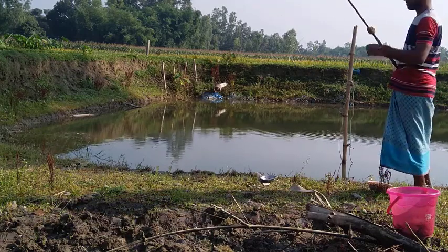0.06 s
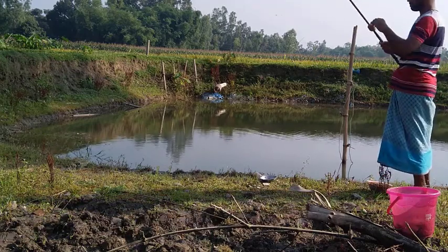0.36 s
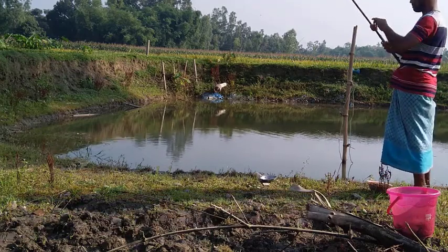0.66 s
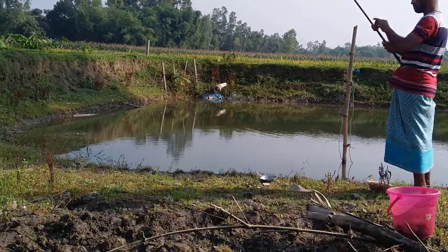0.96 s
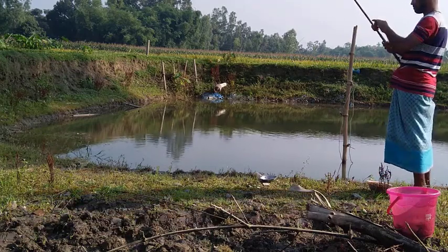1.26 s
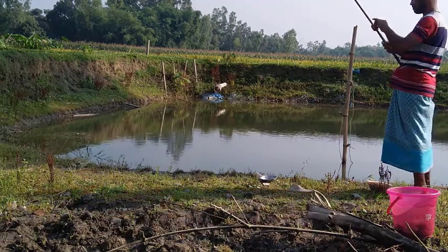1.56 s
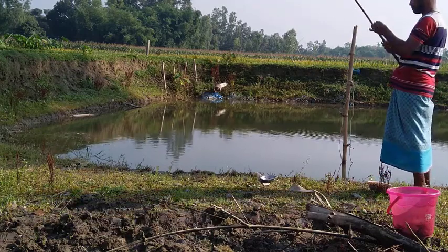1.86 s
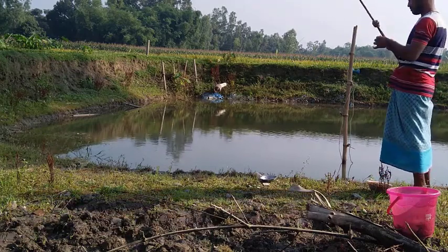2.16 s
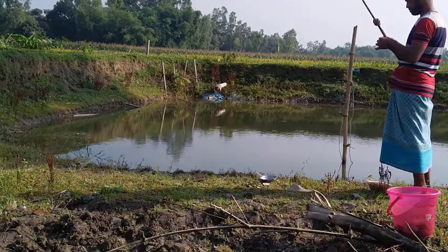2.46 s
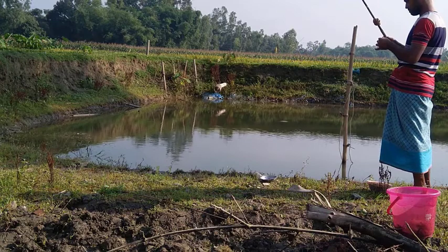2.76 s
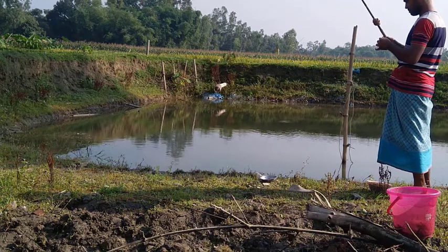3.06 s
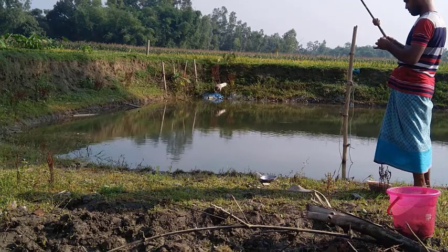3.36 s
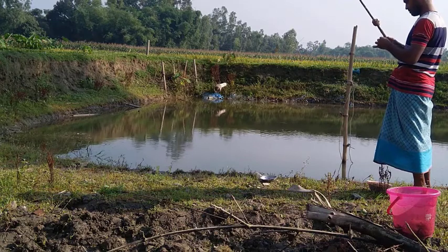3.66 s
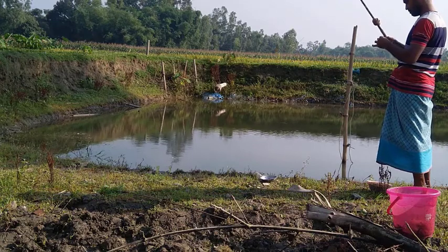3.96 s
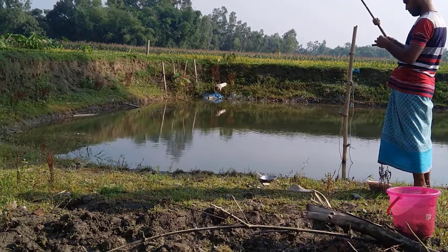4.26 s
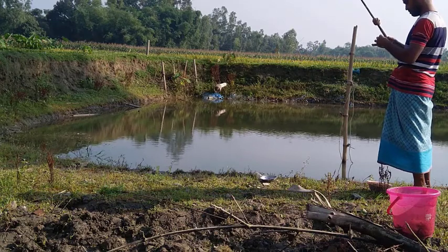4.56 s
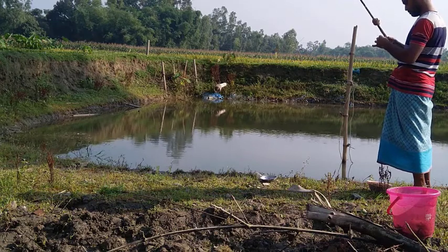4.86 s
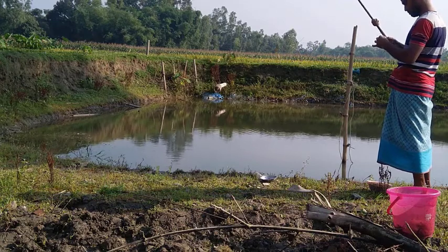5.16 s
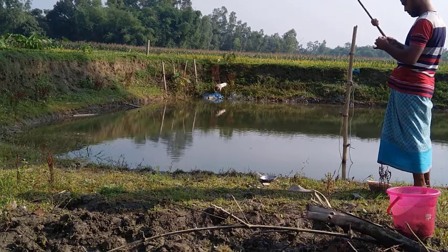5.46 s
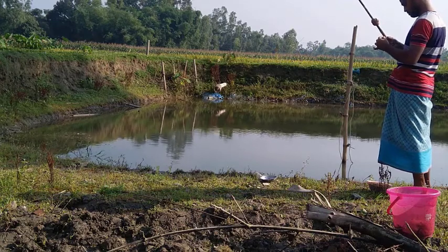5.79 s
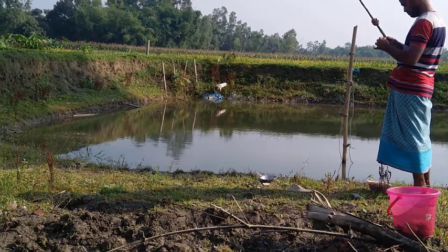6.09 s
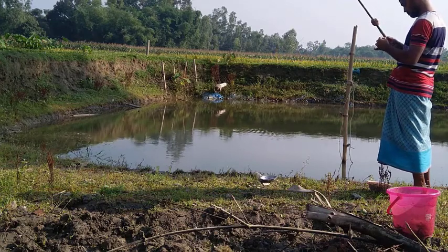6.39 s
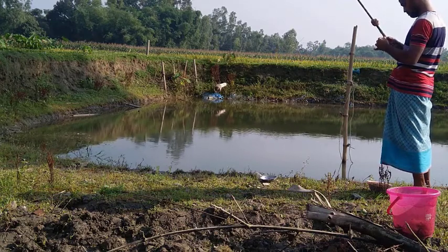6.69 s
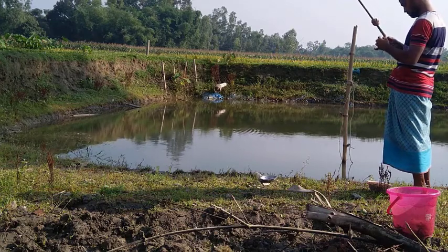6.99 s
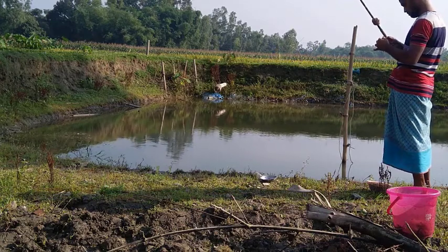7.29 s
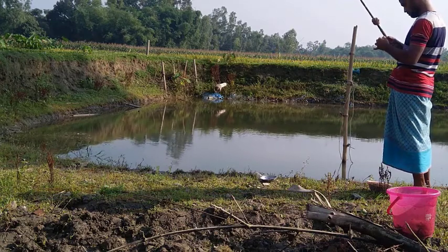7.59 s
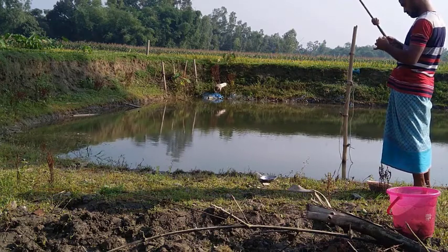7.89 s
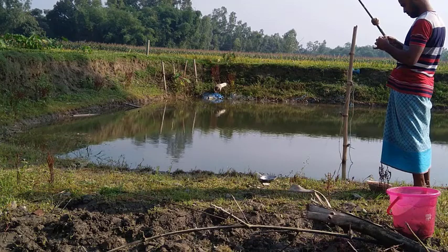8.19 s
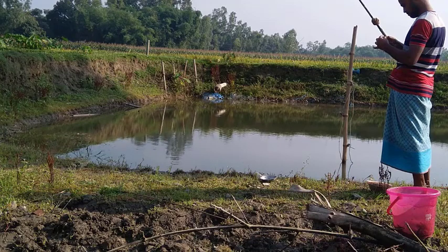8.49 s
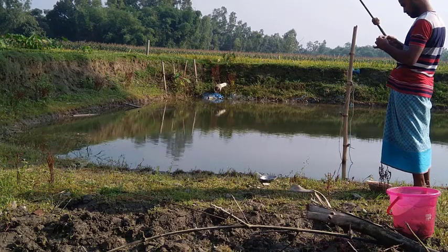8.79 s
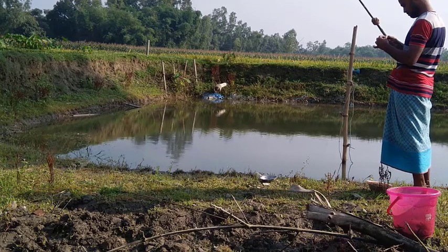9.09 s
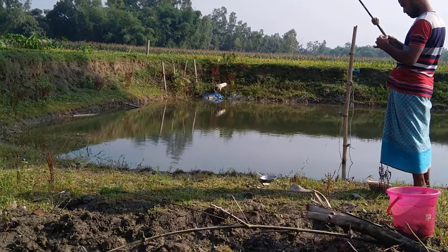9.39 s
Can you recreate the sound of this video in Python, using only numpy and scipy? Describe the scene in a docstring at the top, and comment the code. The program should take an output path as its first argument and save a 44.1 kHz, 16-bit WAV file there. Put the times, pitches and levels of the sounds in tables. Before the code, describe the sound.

Beside a pond in open fields, a nearby bird repeats a squeaky phrase of three falling notes at an even pace, and a second answers from farther off. High crickets chirp throughout, with soft rustles and light wind on the microphone. Midway, another bird gives a few thin arched whistles, while a distant idling engine speeds up and draws nearer as a low throb. The stereo sound leans to the right.

```python
"""A stereo microphone at a pond among fields. From the start crickets chirp and trill in the grass with
their wings, a slow engine idles far off and a bird whistles thin notes. Almost at once something rustles
close by, and a near bird begins repeating a squeaky phrase of three falling notes; a second answers from
farther off. Low calls follow from the tree line, then light gusts touch the microphone. After four seconds
the whistler gives a few long arched notes; after five the engine speeds up and draws nearer."""
import sys
import numpy as np
from scipy import signal
from scipy.fft import rfft, irfft, next_fast_len
from scipy.io import wavfile
from scipy.ndimage import uniform_filter1d

SR = 44100
rng = np.random.default_rng(int(sys.argv[2]) if len(sys.argv) > 2 else 0)


def int16_out(signal):
    """Quantize to a 16-bit WAV file."""
    q = np.round(np.clip(np.atleast_2d(signal).T, -1, 1) * 32767)
    wavfile.write(sys.argv[1], SR, q.astype(np.int16))


N = 425124
TIME = np.arange(N) / SR


def from_db(db):
    """Decibels to gain."""
    return 10 ** (np.asarray(db) / 20)


def rms_one(x):
    """Scale to unit power."""
    return x / np.sqrt(np.mean(x ** 2) + 1e-20)


def in_time(curve):
    """A curve of (t/s, value) points, read at every sample."""
    return np.interp(TIME, *np.transpose(curve))


def at_hz(spectrum, hz):
    """Read a spectrum on a log-frequency axis."""
    f, db = np.transpose(spectrum)
    return np.interp(np.log(np.maximum(hz, 1)), np.log(f), db)


def span(start, end):
    """The samples of a note, and its progress from 0 to 1."""
    at = slice(*np.searchsorted(TIME, [start, end]))
    return at, (TIME[at] - start) / (end - start)


def drift(rate_hz):
    """A random wander with spread 1, mostly slower than rate_hz."""
    pole = np.exp(-40 * np.pi * rate_hz / SR)
    slow = signal.lfilter([1], [1, -2 * pole, pole * pole], rng.standard_normal(N // 20 + 2002))[2000:]
    return np.interp(np.arange(N) / 20, np.arange(len(slow)), rms_one(slow))


def delayed(x, seconds):
    """The same sound, later."""
    return np.interp(TIME - seconds, TIME, x, left=0, right=0)


def place(x, pan_db, lead_ms):
    """Set a source before the microphone: the left side is louder by pan_db and earlier by lead_ms."""
    gains = from_db([[pan_db / 2], [-pan_db / 2]])
    return np.array([x, delayed(x, lead_ms * 1e-3)]) * gains / gains.mean()


def noise(spectrum, alike, pan_db, lead_ms):
    """Stereo noise of a given colour, left-right likeness (0 to 1) and direction."""
    size = next_fast_len(N)
    hz = np.fft.rfftfreq(size, 1 / SR)
    mid, side = rfft(rng.standard_normal((2, size))) * from_db(at_hz(spectrum, hz))
    left, right = np.sqrt(1 + alike) * mid + np.sqrt(1 - alike) * side * [[1], [-1]]
    right = right * from_db(-pan_db) * np.exp(-2j * np.pi * hz * lead_ms / 1000)
    return rms_one(irfft(np.array([left, right]), size)[:, :N])


def patchy(pair, depth_db, frames):
    """Neighbouring pitches swell and fade on their own, in patches a few frames long."""
    _, _, cells = signal.stft(pair, nperseg=512)
    patches = uniform_filter1d(rng.standard_normal(cells.shape[1:]), size=3, axis=0)
    patches = rms_one(uniform_filter1d(patches, size=frames, axis=1))
    _, mottled = signal.istft(cells * from_db(depth_db * patches))
    return rms_one(mottled[:, :N])


def scatter(pair, wet_db, t60):
    """Grass and trees send back a diffuse tail, different on each side."""
    t = TIME[:SR]
    tail = rng.standard_normal((2, SR)) * from_db(-60 * t / t60) * (1 - np.exp(-t / .008))
    tail /= np.sqrt(np.sum(tail ** 2, axis=1, keepdims=True))
    return pair + from_db(wet_db) * signal.fftconvolve(pair, tail, axes=1)[:, :N]


# colour of the far field and its insects: f/Hz, relative level/dB
HISS_SPECTRUM = [(300, -5), (1000, -1), (2700, -23.5), (3600, -9), (6400, -15), (7400, -7.5), (8500, -8),
                 (9400, 3), (10400, -3), (11000, -29.5)]

def far_hiss():
    """A faint, steady hiss from all round the microphone."""
    return from_db(-58.5) * noise(HISS_SPECTRUM, alike=0.29, pan_db=-1.0, lead_ms=0.37)


# colour of a mid-pitched background hiss: f/Hz, relative level/dB
MID_HISS_SPECTRUM = [(250, -17), (450, -9.5), (700, 5.5), (1100, 2.5), (1500, 6.5), (1950, 2), (2300, -3),
                     (2700, 0.5), (3100, -5), (3700, -29), (6000, -38)]
# its level between rustles: t/s, level/dB
MID_HISS_LEVEL = [(0, -63.5), (2.6, -65.5), (4.3, -57.5), (5.8, -54.5), (6.3, -42.5), (7.2, -53),
                  (7.95, -50), (8.4, -42), (9.64, -42)]

def mid_hiss(rustle_swell):
    """A mid-pitched background hiss that flickers, swells and sinks, rising with each rustle."""
    hiss = patchy(noise(MID_HISS_SPECTRUM, alike=0.71, pan_db=-9.5, lead_ms=0.42), depth_db=3.5, frames=12)
    level = np.hypot(from_db(in_time(MID_HISS_LEVEL)), rustle_swell)
    return level * from_db(2.25 * drift(20)) * hiss


# the engine idles, then picks up speed: t/s, firing rate/Hz
FIRING_RATE = [(5.3, 37.8), (5.96, 39.8), (6.57, 42.3), (7.34, 41.6), (8.45, 44.4), (9.64, 48.1)]
# its loudness as it nears the microphone: t/s, level/dB
ENGINE_APPROACH = [(0, -40.5), (.6, -43), (1.0, -35), (2.0, -33), (2.8, -37.5), (3.4, -35.5), (4.0, -39),
                   (5.2, -33), (5.5, -25.5), (6.6, -22), (7.4, -25), (8.3, -22.5), (9.0, -19),
                   (9.64, -17.5)]
# colour of the exhaust from a distance: f/Hz, relative level/dB
EXHAUST_SPECTRUM = [(40, -24), (65, -19.5), (85, -2.5), (125, -3), (148, -0.5), (172, -15), (210, -13),
                    (260, -27.5), (330, -28.5)]
# colour of the rumble beneath it: f/Hz, relative level/dB
RUMBLE_SPECTRUM = [(20, -17.5), (45, -21.5), (75, -1.5), (120, 2), (190, -1.5), (250, -12), (330, -25),
                   (450, -42), (700, -66)]

def engine():
    """Only the lowest orders of the exhaust carry this far; they waver in the air, over a dull rumble."""
    firing_hz = in_time(FIRING_RATE)
    hunting = np.interp(TIME, [4.8, 5.8], [.04, .0027])   # uneven at idle, steady under load
    phase = 2 * np.pi * np.cumsum(firing_hz * (1 + hunting * drift(3.485))) / SR
    # the orders keep in step, so each firing is one throb
    throb = sum(from_db(at_hz(EXHAUST_SPECTRUM, k * firing_hz) + 1.5 * drift(2.26)) * np.sin(k * phase)
                for k in range(1, 7))
    clear_db = np.interp(TIME, [0, 4.5, 6.1, 9.6], [-3.5, -3.5, 0, -0.05])   # clearer as it nears
    exhaust = np.sqrt(2) * from_db(clear_db) * place(throb, pan_db=-5.5, lead_ms=-0.45)
    rumble_level = from_db(-6.0 - clear_db + 2.54 * drift(8.6))
    rumble = rumble_level * noise(RUMBLE_SPECTRUM, alike=0.96, pan_db=-6.5, lead_ms=-0.26)
    return from_db(in_time(ENGINE_APPROACH)) * (exhaust + rumble)


def thin_tones():
    """Two faint, blurred tones waver far away to the right, then fade out."""
    tones = np.zeros(N)
    for hz, db in [(2460, -62.5), (1538, -57.5)]:
        blur = drift(53) * from_db(2 * drift(5.7))
        wavering_hz = hz * (1 + 0.019 * drift(1.5))
        tones += from_db(db) * blur * np.sin(2 * np.pi * np.cumsum(wavering_hz) / SR)
    fade = np.interp(TIME, [0, 2.2, 4.1, 5.0], [0.33, 0.69, 1, 0])
    return place(tones * fade, pan_db=-12.0, lead_ms=0.42)


def cricket(bouts, length_s, strokes_hz, sag, rasp):
    """Every wing stroke is a tone pulse that sags in pitch; a bout swells, rises a little and stops."""
    out = np.zeros(N)
    teeth = 1 + rasp * drift(550)
    pace = 1 + 0.012 * drift(11)
    effort = from_db(0.85 * drift(50))
    for end, hz, db in bouts:
        at, progress = span(end - length_s, end)
        stroke = np.cumsum(strokes_hz * pace[at]) / SR % 1
        rise = 1 + 0.013 * (np.sin(2 * progress) - .85)
        pitch_hz = hz * teeth[at] * (1 - sag * (stroke - .5)) * rise
        pulses = np.sin(np.pi * stroke) ** 2 * np.sin(2 * np.pi * np.cumsum(pitch_hz) / SR)
        swell = np.sin(np.pi / 2 * np.clip(progress / .62, 0, 1)) ** 2
        stop = np.clip((end - TIME[at]) / .02, 0, 1)
        out[at] += 2 * from_db(db) * swell * stop * effort[at] * pulses
    return out


# high crickets close by, in even runs: first chirp's end t/s, last chirp's end t/s, f/Hz, level/dB
HIGH_CHIRP_RUNS = [(.24, 1.198, 9440, -36.5), (1.55, 1.74, 9310, -46), (2.17, 2.46, 9470, -39.5),
                   (2.75, 3.39, 9470, -38), (4.022, 4.4, 9520, -45), (4.64, 5.51, 9500, -37.5),
                   (5.842, 5.84, 9410, -44.5), (6.28, 6.54, 9710, -44.5), (6.789, 7.73, 9450, -36.5),
                   (8.16, 8.429, 9730, -46.5), (8.73, 9.68, 9515, -35.5)]
# a cricket with a long swelling trill: end t/s, f/Hz
LONG_TRILLS = [(.89, 7990), (2.07, 7820), (3.28, 8015), (4.51, 8084), (5.64, 7963), (6.81, 8020),
               (7.96, 7940), (9.11, 8000)]
# a lower cricket with short buzzes: end t/s, level/dB
LOW_BUZZES = [(.08, -42), (.84, -44.5), (2.01, -44.5), (2.335, -41), (2.636, -40), (3.46, -50), (5.11, -41),
              (5.41, -40.5), (7.64, -41), (7.955, -42), (8.81, -42)]
# crickets farther out, in even time: from t/s, to t/s, period/s, f/Hz, level/dB
FAR_CHORUS = [(.22, 3.5, 0.24, 10310, -52.5), (4.5, 9.7, .26, 10320, -57.5), (5.3, 7.6, 0.074, 10620, -57),
              (8.38, 8.65, 0.066, 10700, -62), (.302, 3.6, .26, 9111, -46.5), (4.0, 9.7, 0.27, 9120, -48.5),
              (6.5, 9.7, 0.23, 9750, -47.5)]

def crickets(chirp_every_s=.315, trill_db=-41.5, buzz_hz=7430):
    """Three kinds sing close to the microphone, and more keep time farther out in the grass."""
    chance = rng.standard_normal
    chirps = [(s, hz * (1 + 0.0026 * chance()), db) for first, last, hz, db in HIGH_CHIRP_RUNS
              for s in np.linspace(first, last, 1 + round((last - first) / chirp_every_s))]
    trills = [(s, hz, trill_db) for s, hz in LONG_TRILLS]
    buzzes = [(s, buzz_hz, db) for s, db in LOW_BUZZES]
    far_chirps = [(s + .025 * chance(), hz * (1 + 0.0064 * chance()), db + 2.0 * chance())
                  for first, last, period, hz, db in FAR_CHORUS for s in np.arange(first, last, period)]
    high = cricket(chirps, length_s=0.29, strokes_hz=97.55, sag=0.072, rasp=0.0079)
    trill = cricket(trills, length_s=.62, strokes_hz=179.7, sag=0.035, rasp=0.016)
    low = cricket(buzzes, length_s=.17, strokes_hz=174.7, sag=0.0067, rasp=0.012)
    chorus = cricket(far_chirps, length_s=0.16, strokes_hz=101.8, sag=0.026, rasp=0.0053)
    return (scatter(place(high, pan_db=-15, lead_ms=.1), wet_db=-10, t60=.15)
            + scatter(place(trill, pan_db=-12, lead_ms=.34), wet_db=-3, t60=.05)
            + scatter(place(low, pan_db=-12.0, lead_ms=0.15), wet_db=-5.0, t60=0.37)
            + scatter(place(chorus, pan_db=-3.5, lead_ms=0.16), wet_db=1.0, t60=0.14))


def arched_notes(notes, waver, rise_per_s=.27, fall_per_s=.43):
    """Thin tones that hold briefly, arch over and fall to a firm end; longer notes arch more."""
    out = np.zeros(N)
    wobble = 1 + waver * drift(55)
    flutter = from_db(2.35 * drift(18))
    for start, length, top_hz, db in notes:
        at, progress = span(start, start + length)
        arch = 2 * np.clip((progress - .12) / .88, 0, 1) - 1   # -1 to 1, with the top at 0
        hz = top_hz * (1 - length * np.where(arch < 0, rise_per_s, fall_per_s) * arch ** 2)
        level = from_db(db) * np.clip(np.minimum(5 * progress, 9 * (1 - progress)), 0, 1)
        out[at] += level * np.sin(2 * np.pi * np.cumsum(hz * wobble[at]) / SR)
    return out * flutter


# right of centre, a whistler's high notes and, in the second row, one short low note like the end of
# the far bird's squeaky phrase: start t/s, length/s, top f/Hz, level/dB
CLEAR_NOTES = [(.02, 0.083, 2243, -47.5), (.181, 0.025, 863, -36.5), (3.06, 0.088, 3400, -55),
               (4.22, 0.29, 3005, -36), (5.07, .33, 2823, -34.5), (5.94, .293, 2727, -34),
               (6.54, 0.2, 2500, -34.5), (6.796, 0.098, 2340, -40.5)]

def small_birds(twitter_count):
    """High whistles with one short low note among them; far off, a sinking run of pips and twitter."""
    pips = [(s, .09, hz, -64) for s, hz in zip(np.arange(.55, 1.9, .23), np.geomspace(5450, 5050, 6))]
    twitter = [(s, .07, hz, -69 + 2.7 * loud - (hz - 2600) / 200)
               for s, hz, loud in rng.uniform([0, 2600, 0], [9.6, 4300, 3], (twitter_count, 3))]
    far = place(arched_notes(pips + twitter, waver=.018), pan_db=-5.0, lead_ms=.3)
    clear = place(arched_notes(CLEAR_NOTES, waver=0.0029), pan_db=-8.0, lead_ms=0.47)
    return scatter(clear, wet_db=-12.5, t60=0.59) + scatter(far, wet_db=7, t60=0.18)


# the phrase, before each bird's own stretch and pitch:
# t/s from the call, length/s, top f/Hz, final f/Hz, relative level/dB
SQUEAK_PHRASE = [(-.020, .038, 1375, 850, -1.5), (0.047, 0.046, 1228, 905, -3.5),
                 (.119, .052, 1255, 938, -0.14)]

def squeaks(calls, stretch, pitch, rough):
    """Each note is a nearly pure tone that scoops up, drops fast and levels out; no two are alike."""
    crest_s, scoop_s, fall_s = 0.00863, 0.00917, 0.01121
    attack_s, release_s = 0.015, 0.018
    catch_hz, catch_s, catch_db = 1740, 0.0058, -19.5   # each note opens with a tiny high catch
    out = np.zeros(N)
    waver = 1 + rough * drift(210)
    for call_s, call_db in calls:
        for after, length, top_hz, final_hz, db in SQUEAK_PHRASE:
            sharp, loud = rng.standard_normal(2)
            at, progress = span(call_s + stretch * after, call_s + stretch * (after + length))
            age = progress * length
            crest = np.exp(-((age - crest_s) / np.where(age < crest_s, scoop_s, fall_s)) ** 2)
            hz = (final_hz + (top_hz - final_hz) * crest) * waver[at] * pitch * (1 + .01 * sharp)
            attack = np.sin(np.pi / 2 * np.minimum(age / attack_s, 1))
            release = np.minimum((length - age) / release_s, 1)
            tone = attack * release * np.sin(2 * np.pi * np.cumsum(hz) / SR)
            catch_level = from_db(catch_db) * np.sin(np.pi * np.minimum(age / catch_s, 1))
            catch = catch_level * np.sin(2 * np.pi * catch_hz * age)
            out[at] += np.sqrt(2) * from_db(db + call_db + 0.2 * loud) * (tone + catch)
    return out


# calls of the near bird, always about as loud: t/s
NEAR_BIRD_CALLS = [.321, 1.108, 1.984, 2.866, 3.665, 4.453, 5.223, 5.987, 6.783, 7.557, 8.315, 9.060]
# answers from farther off: t/s, level/dB
FAR_BIRD_CALLS = [(.300, -39.5), (.458, -46), (.992, -33), (1.674, -35), (2.360, -34.5), (3.054, -34),
                  (3.743, -34), (4.190, -40), (5.008, -39), (5.849, -35), (6.553, -36.5), (7.263, -36),
                  (8.008, -53), (8.890, -48), (9.511, -37.5)]
# echoes off the pond's banks: delay t/s, relative level/dB
BANK_ECHOES = [(.0085, -12.5), (0.018, -12.5), (0.036, -35), (.052, -41)]

def calling_birds(near_db=-22.5):
    """Two birds of one kind, to the right; the banks echo the nearer, the farther has more tail."""
    near = squeaks([(s, near_db) for s in NEAR_BIRD_CALLS], stretch=1, pitch=0.99, rough=0.0069)
    near = near * (1 + from_db(-31) * drift(700))   # a faint rasp
    near = near + sum(from_db(db) * delayed(near, s) for s, db in BANK_ECHOES)
    far = squeaks(FAR_BIRD_CALLS, stretch=1.06, pitch=0.95, rough=0.018)
    return (scatter(place(near, pan_db=-9.5, lead_ms=0.26), wet_db=-15.0, t60=0.79)
            + scatter(place(far, pan_db=-10.0, lead_ms=0.33), wet_db=-7, t60=0.9))


# rustles close to the microphone: start t/s, length/s, body level/dB, crackle level/dB
CLOSE_RUSTLES = [(.294, .18, -49.5, -75), (1.071, 0.36, -47, -76), (1.342, .3, -46, -57.5),
                 (1.943, 0.31, -39, -64), (2.836, 0.19, -46.5, -81), (3.662, 0.24, -40, -64),
                 (4.123, 0.12, -45, -67), (4.466, 0.2, -33.5, -49.5), (4.861, 0.32, -34.5, -56),
                 (5.196, 0.51, -41, -81), (5.908, 0.21, -40.5, -63), (6.408, 0.52, -49, -70),
                 (7.49, 0.3, -47.5, -79), (7.986, 0.13, -44, -74.5), (8.234, 0.34, -41.5, -57),
                 (8.508, 0.23, -39.5, -52), (9.188, 0.17, -35.5, -45)]
# colour of their crackle: f/Hz, relative level/dB
CRACKLE_SPECTRUM = [(800, -4.5), (2600, -4), (3400, 13), (4200, 16), (5200, 4), (6500, 3), (9000, -13.5),
                    (12000, -29.5)]

def rustles():
    """Each starts fast, crackles and tapers off; gives the swell of their body, and their crackle."""
    swell, grit = np.zeros((2, N))
    for start, length, body_db, crackle_db in CLOSE_RUSTLES:
        progress = np.maximum(TIME - start, 0) / length
        stroke = np.minimum(progress / 0.041, 1) * np.exp(-1.6 * progress ** 2)
        swell += from_db(body_db) * stroke
        grit += from_db(crackle_db) * stroke
    leaves = patchy(noise(CRACKLE_SPECTRUM, alike=0.33, pan_db=0.5, lead_ms=.39), depth_db=4.5, frames=5)
    flicker = from_db(-1 + 1.7 * drift(150) + 2.4 * drift(24))
    return swell, grit * flicker * leaves


# low calls from the tree line: start t/s, length/s, first f/Hz, level/dB
TREE_LINE_HOOTS = [(0.59, 0.17, 732, -54.5), (.835, .17, 771, -48.5), (1.219, 0.42, 752, -53),
                   (1.929, 0.4, 748, -54.5), (2.514, 0.4, 731.4, -51), (3.082, 0.5, 768, -49.5),
                   (3.717, 0.73, 736.4, -52.5), (4.878, 0.54, 717, -51), (5.585, 0.33, 737, -53.5),
                   (6.198, 0.33, 772, -51.5), (7.179, 0.4, 741.6, -57), (7.952, 0.29, 772, -56.5),
                   (8.554, 0.19, 760.4, -59)]

def hooting_birds(sag_hz_per_s=290):
    """Distant low calls, each smeared into a narrow, sinking band."""
    out = np.zeros(N)
    blur = drift(46) + 1j * drift(45)
    for start, length, first_hz, db in TREE_LINE_HOOTS:
        at, progress = span(start, start + length)
        tone = np.exp(2j * np.pi * np.cumsum(first_hz - sag_hz_per_s * length * progress) / SR)
        swell = np.sqrt(np.abs(np.sin(np.pi * progress)))
        out[at] += from_db(db) * swell * (blur[at] * tone).real
    return scatter(place(out, pan_db=-7.0, lead_ms=0.23), wet_db=2, t60=0.24)


# gusts on the microphone: peak t/s, length/s, relative level/dB
MIC_GUSTS = [(.96, 0.11, -31), (1.334, 0.06, -31), (1.801, 0.29, -28), (2.2, .12, -32),
             (2.563, 0.19, -32.5), (3.353, 0.15, -28), (3.52, 0.038, -21.5), (3.69, 0.13, -26.5),
             (4.275, 0.13, -24.5), (4.546, 0.14, -23), (4.988, .16, -34.5), (5.554, 0.17, -25)]
# colour of their buffeting: f/Hz, relative level/dB
BUFFET_SPECTRUM = [(15, -17), (35, -16.5), (65, 4), (100, 0.5), (160, -12), (300, -29), (600, -88.5)]

def wind_gusts():
    """Lumpy gusts swell and die over a light breeze, and buffet mostly the microphone's right side."""
    gusts = sum(from_db(db) * np.exp(-2 * ((TIME - s) / length) ** 2) for s, length, db in MIC_GUSTS)
    breeze = from_db(-53.5 + 1.66 * TIME)   # freshens steadily
    lumps = from_db(1.5 + 1.6 * drift(8))
    return np.hypot(gusts, breeze) * lumps * noise(BUFFET_SPECTRUM, alike=0.41, pan_db=-22.5, lead_ms=0)


def scene():
    """Everything around the pond, as it reaches the microphone."""
    birds = calling_birds() + small_birds(twitter_count=70) + hooting_birds()
    surroundings = thin_tones() + crickets() + engine() + wind_gusts() + far_hiss()
    rustle_swell, crackle = rustles()
    return birds + surroundings + mid_hiss(rustle_swell) + crackle


def record(dry):
    """The top is cut steeply above 11.1 kHz."""
    return signal.sosfilt(signal.ellip(10, .2, 80, 11100, fs=SR, output="sos"), dry)


dry = scene()
out = record(dry)
int16_out(out)
```